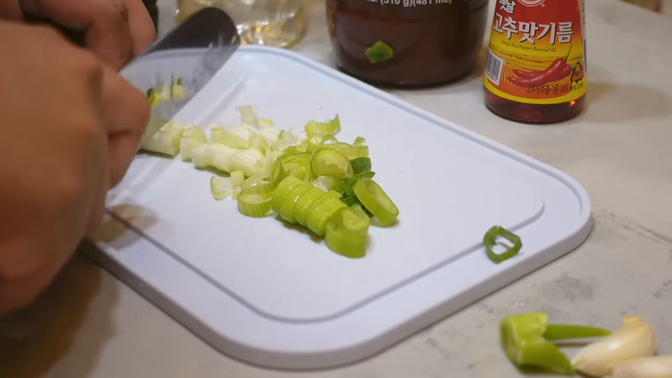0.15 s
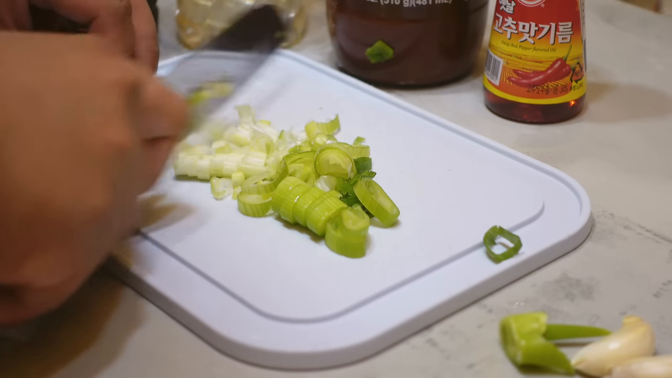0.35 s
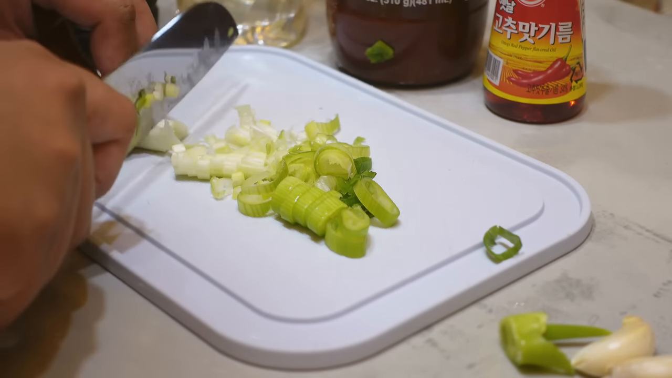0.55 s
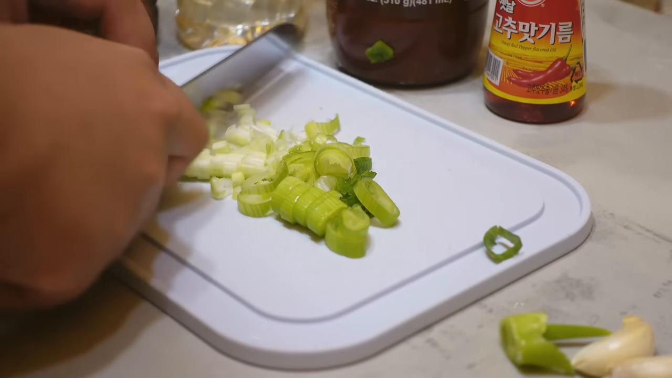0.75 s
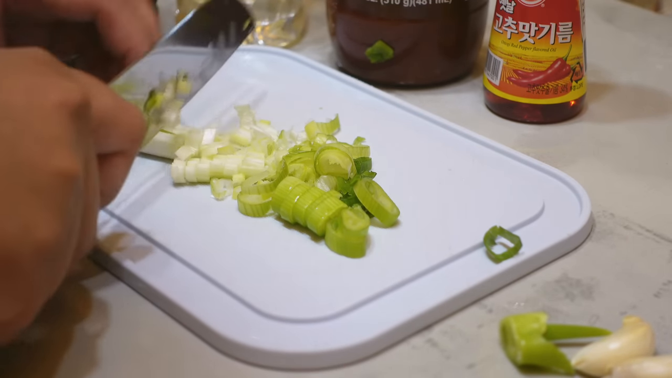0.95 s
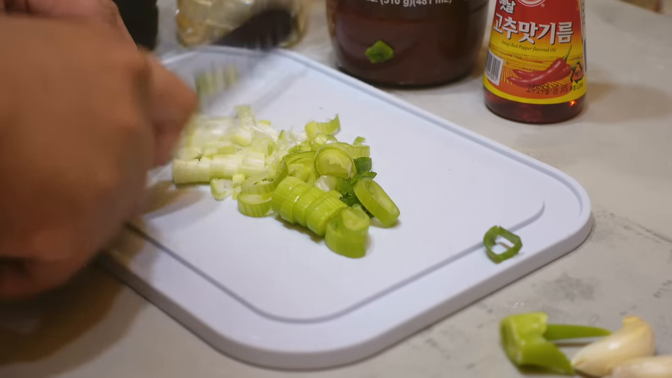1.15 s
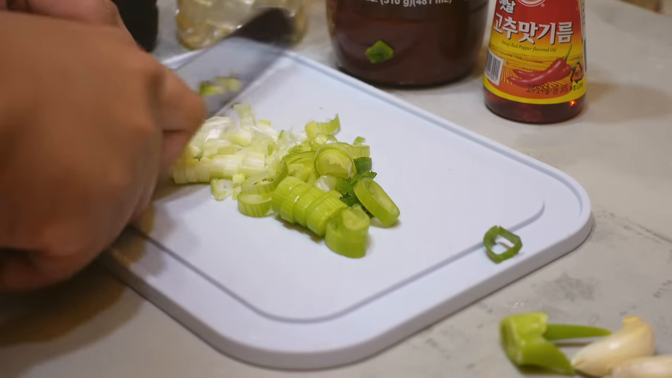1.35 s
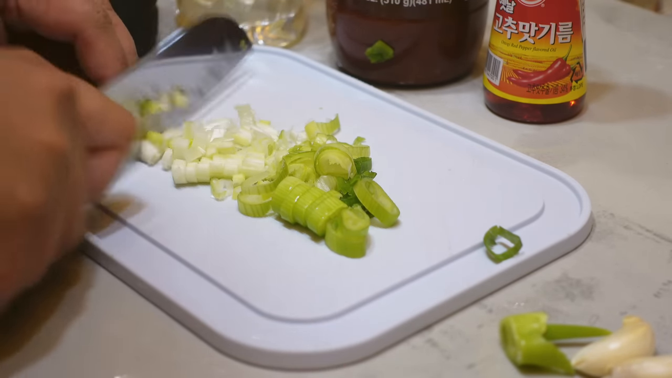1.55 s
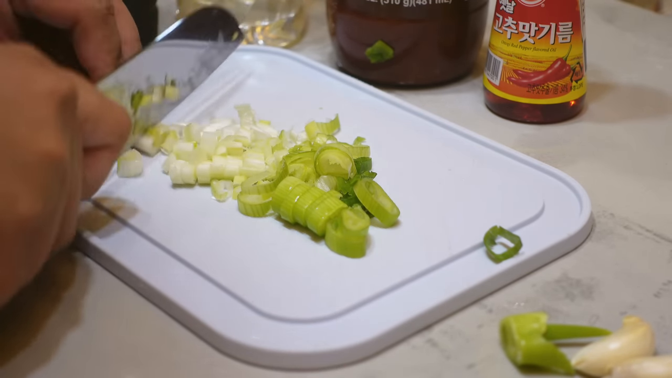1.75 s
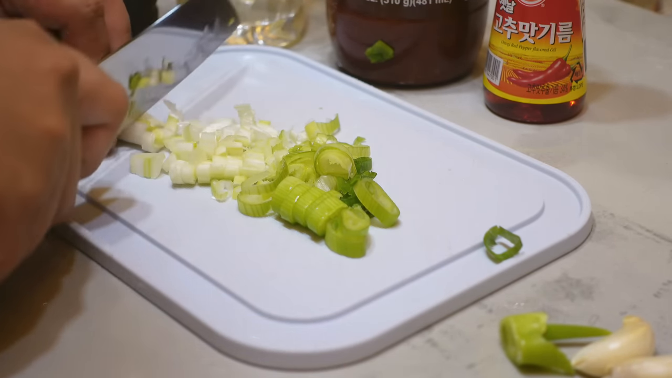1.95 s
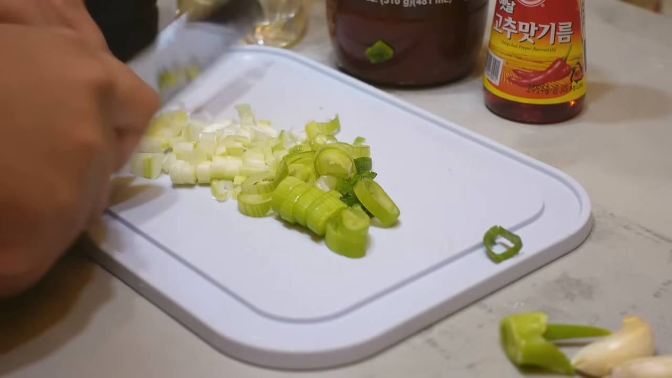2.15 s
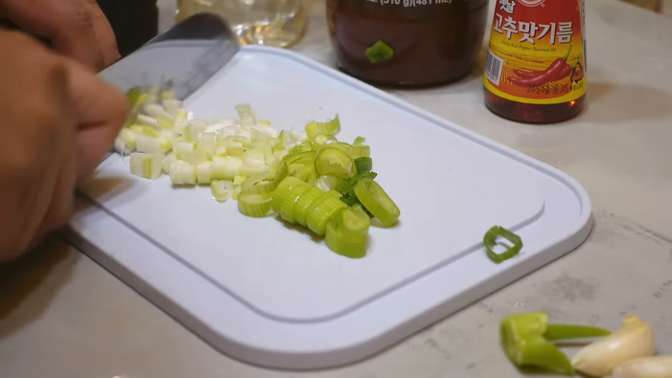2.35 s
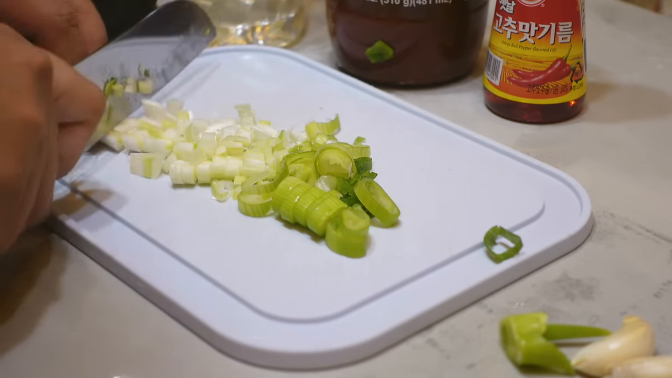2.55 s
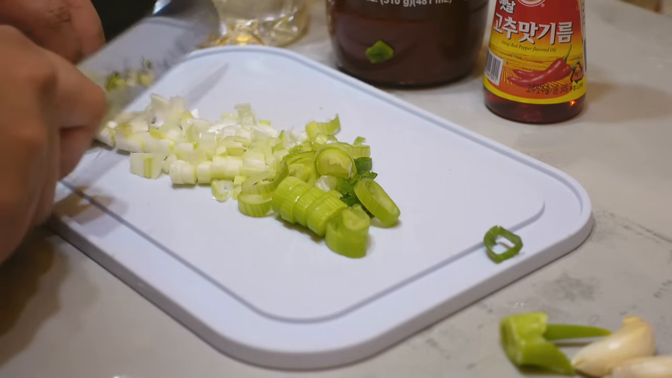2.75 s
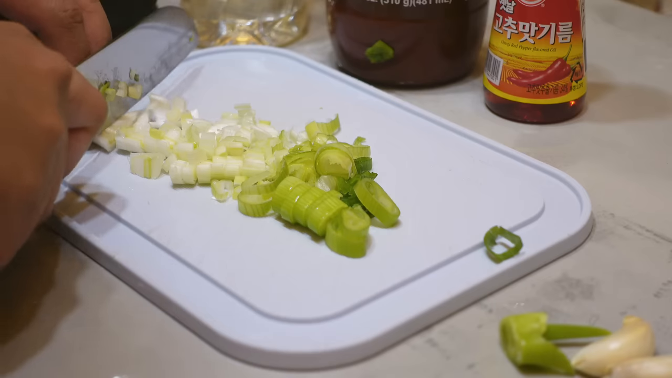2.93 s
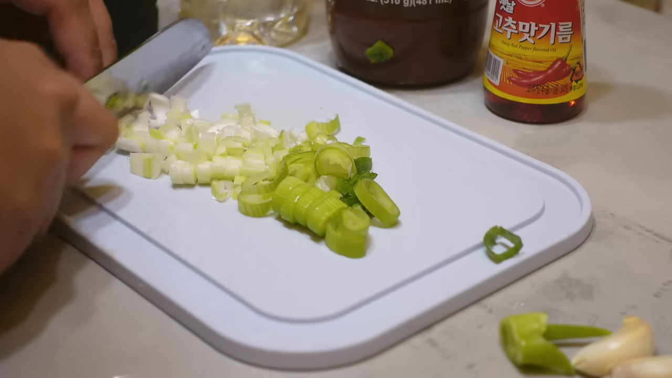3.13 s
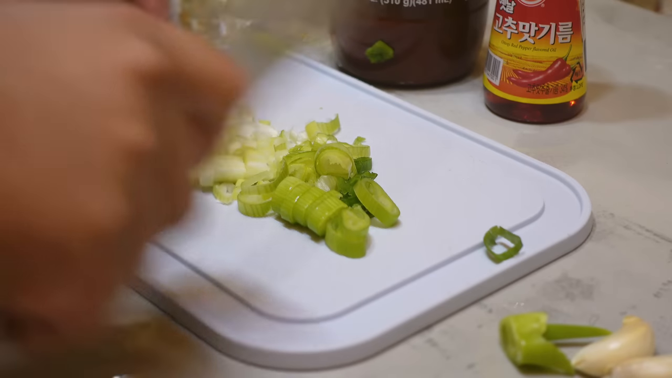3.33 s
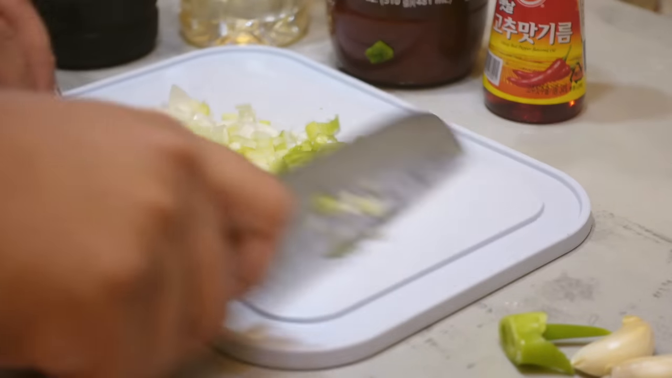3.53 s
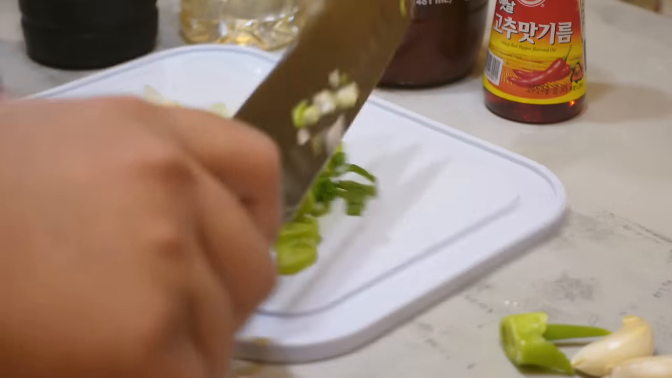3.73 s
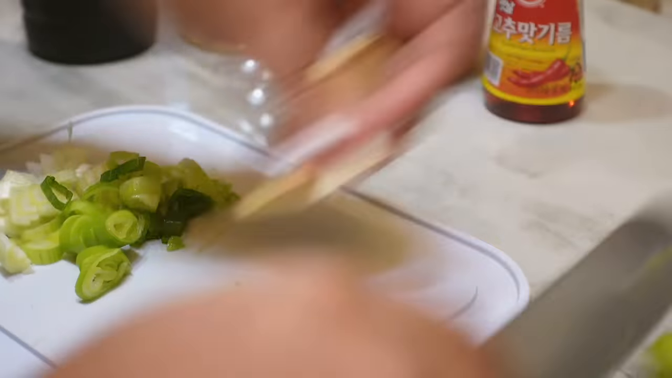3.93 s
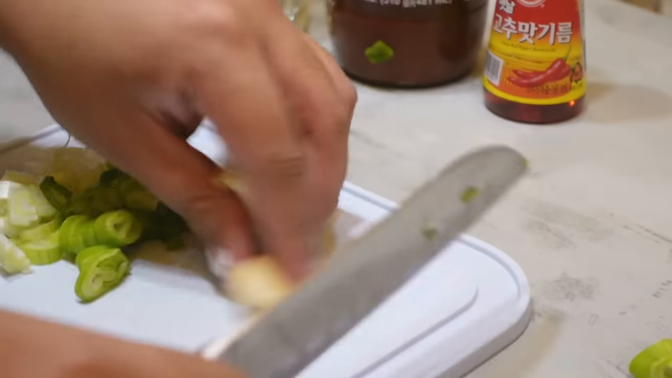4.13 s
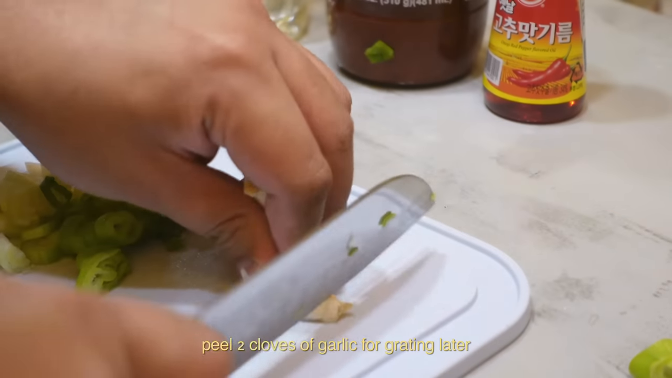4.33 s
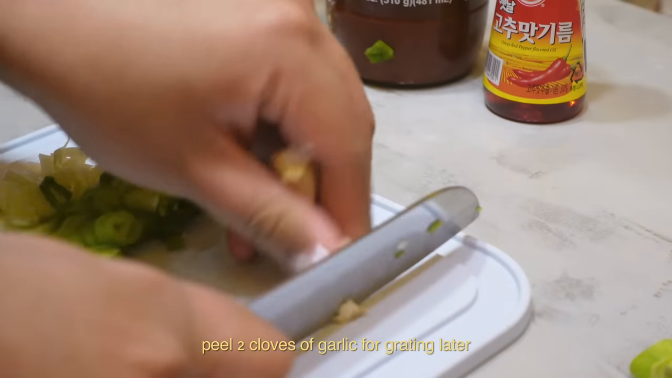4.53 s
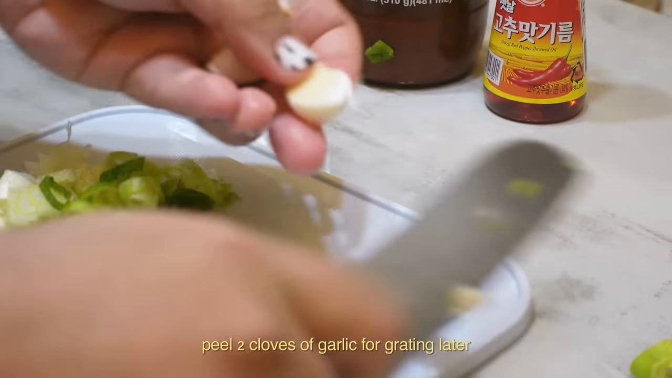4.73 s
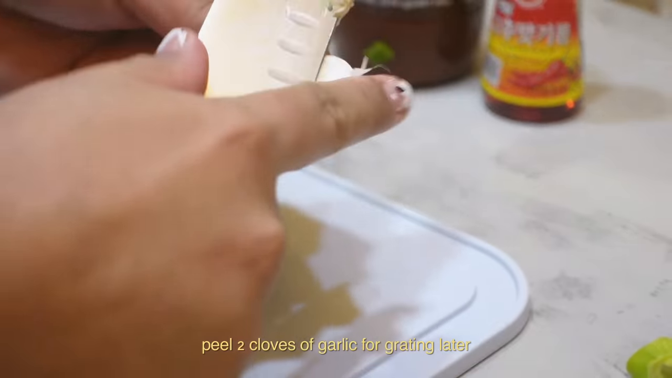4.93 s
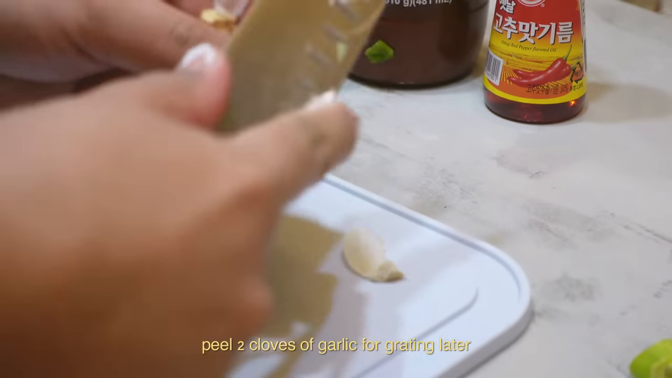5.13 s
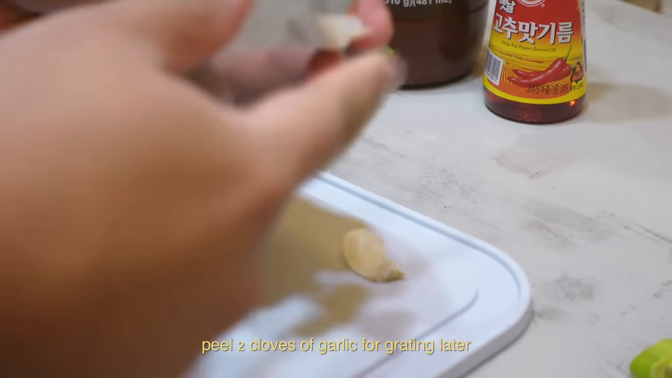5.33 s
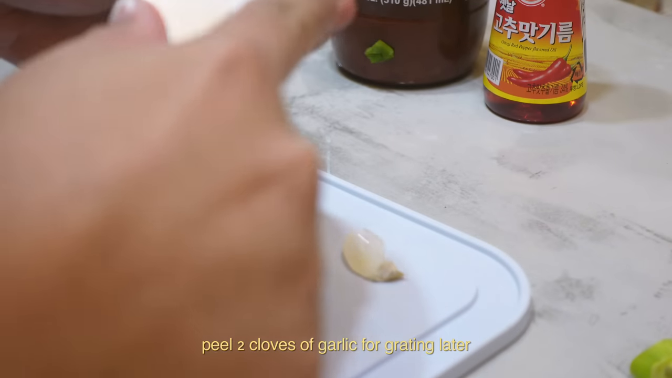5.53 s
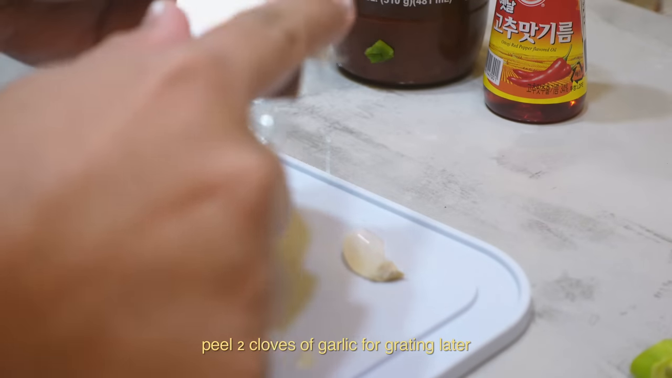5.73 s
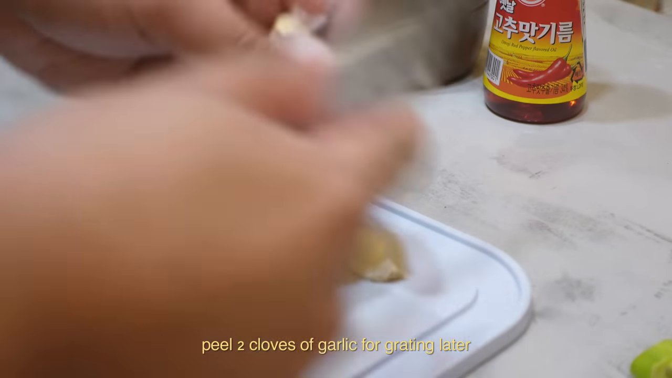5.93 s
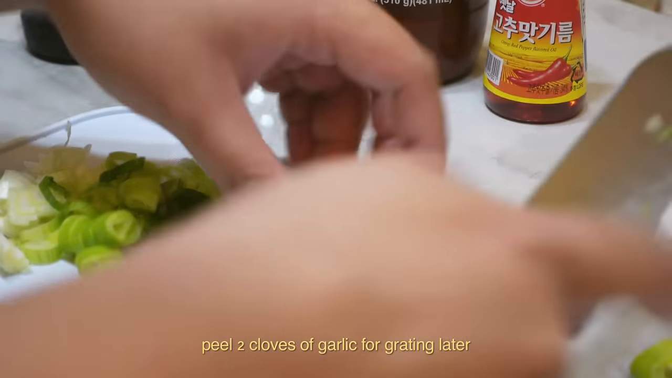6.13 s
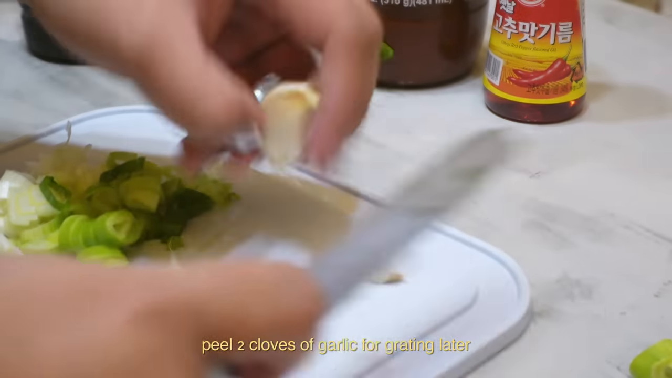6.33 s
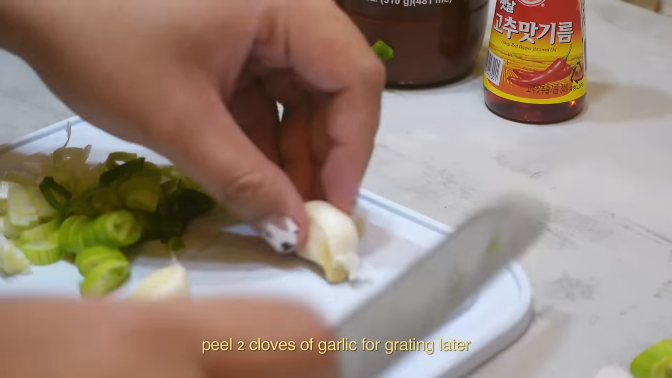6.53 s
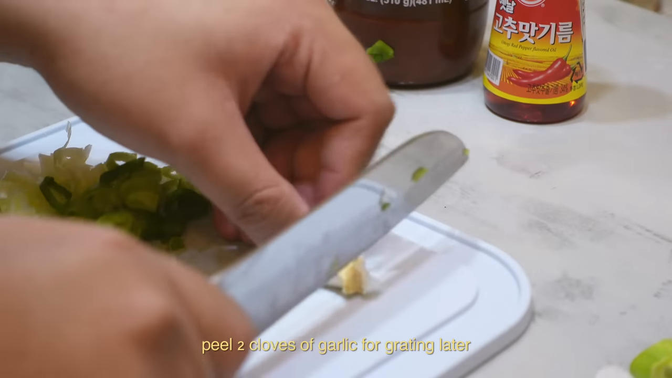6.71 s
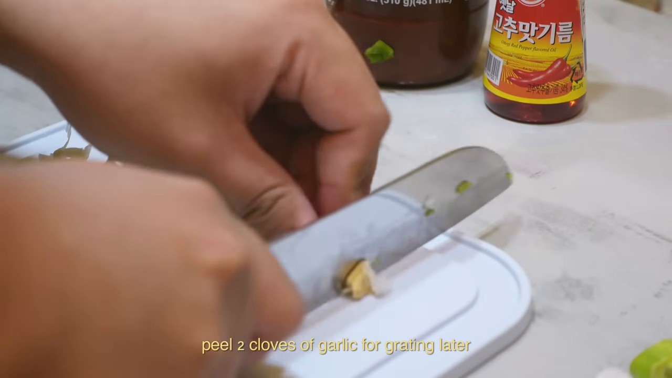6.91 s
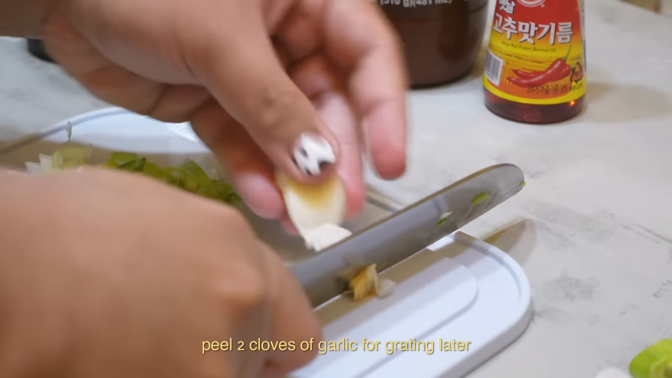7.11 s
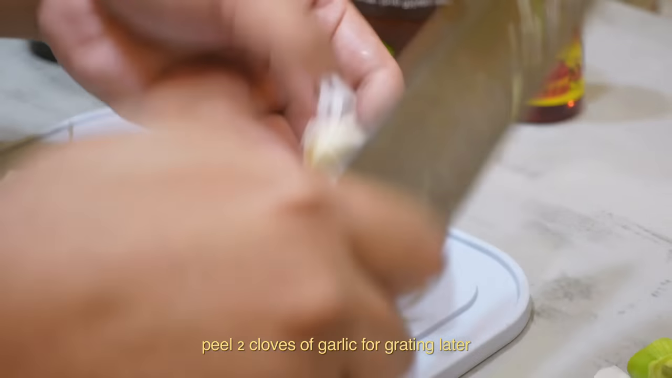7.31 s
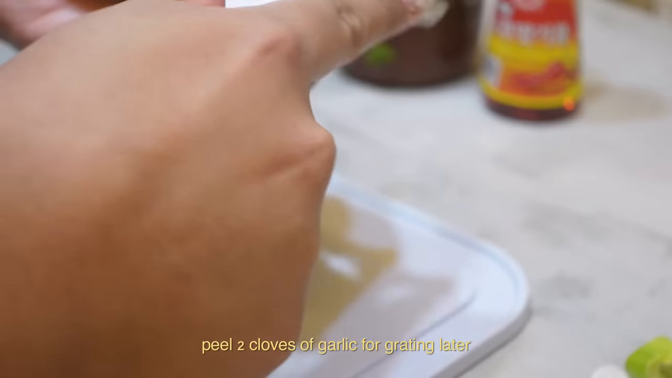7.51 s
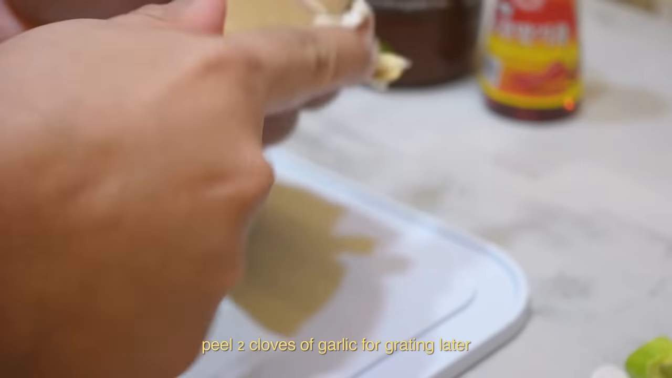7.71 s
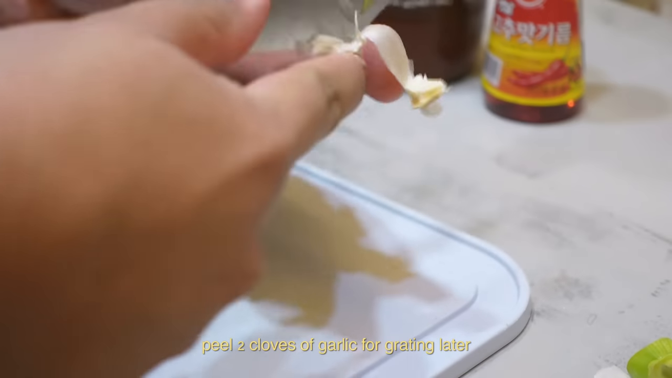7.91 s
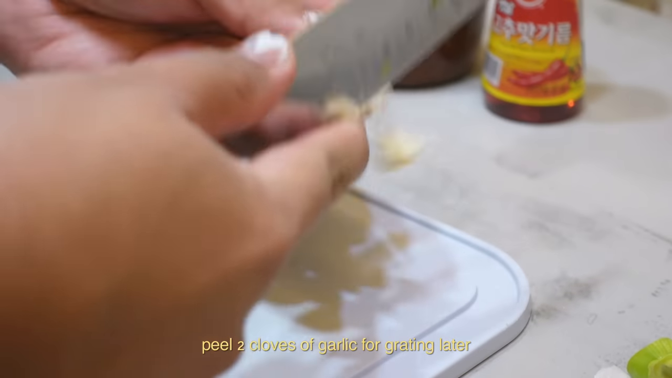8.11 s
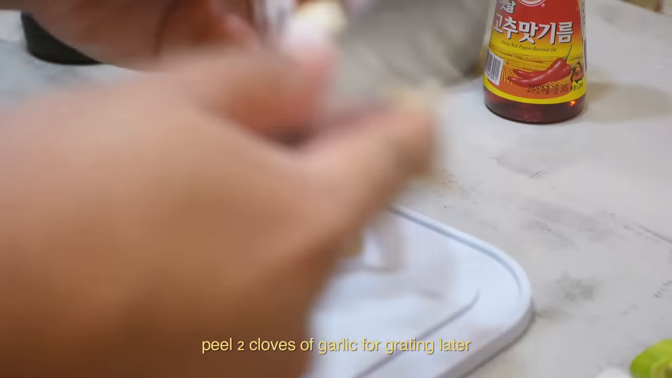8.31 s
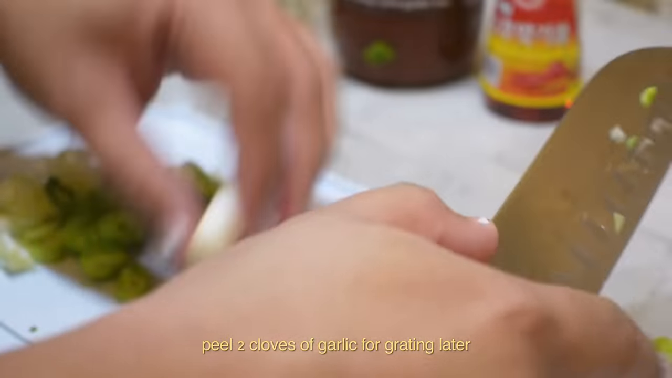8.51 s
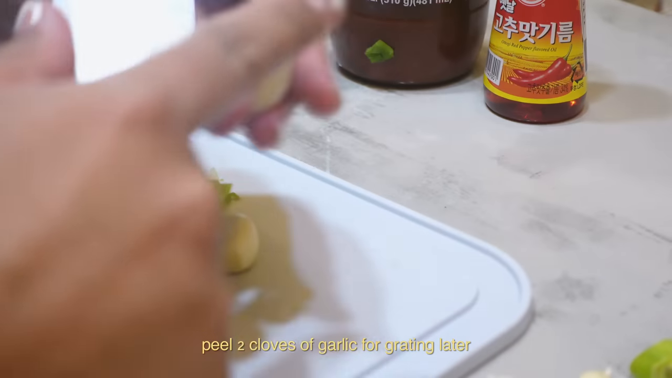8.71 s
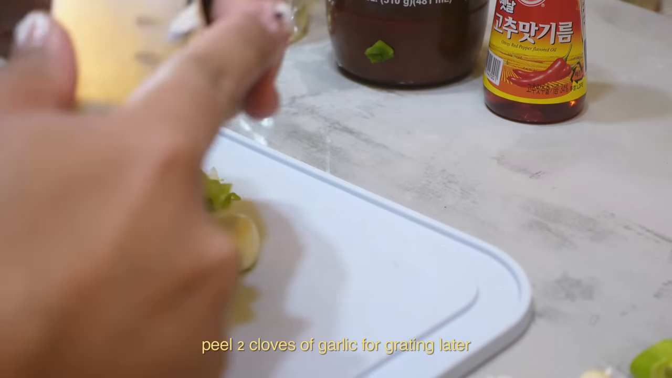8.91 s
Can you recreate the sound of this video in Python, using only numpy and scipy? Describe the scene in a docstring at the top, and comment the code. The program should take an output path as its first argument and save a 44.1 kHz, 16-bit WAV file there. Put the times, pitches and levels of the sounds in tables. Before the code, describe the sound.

Brisk crunchy chopping on a plastic cutting board, followed by quieter garlic trimming with sharp ticks, brief steel rings and papery peeling.

```python
"""Crisp chops on a plastic board in a small tiled kitchen, then garlic being trimmed and peeled.
Each cut is a burst of noise with a short bright echo; board and blade ring in their own modes.
Shaped noise makes the rub of hands and blade and the rustle of dry peel.
Street noise, hiss, an appliance hum and a passing drone lie under all."""
import sys
import numpy as np
from scipy import signal
from scipy.fft import rfft, irfft, next_fast_len
from scipy.io import wavfile
from scipy.ndimage import uniform_filter1d, map_coordinates

SR = 44100
rng = np.random.default_rng(int(sys.argv[2]) if len(sys.argv) > 2 else 0)


def bounce(signal):
    """Save signal as a 16-bit WAV file at the path given by the first command-line argument."""
    frames = np.transpose(np.atleast_2d(signal))
    limited = np.clip(frames, -1, 1)
    pcm = np.round(limited * 32767).astype(np.int16)
    wavfile.write(sys.argv[1], SR, pcm)


def voltage_ratio(level):
    """Linear amplitude factor for a level in decibels (scalar or array-like)."""
    return 10 ** (np.asarray(level, float) / 20)


N = 399526
TIME = np.arange(N) / SR
PEELING_FROM_S = 3.78  # chopping before, garlic after
TOP_HZ = 15900  # upper limit of the echoes, the rubbing and the hiss


def unit(x):
    """Scales a signal to rms 1."""
    return x / np.sqrt(np.mean(x ** 2) + 1e-20)


def along(points, hz):
    """Gain through (hz, gain_db) points on a log frequency axis, shut outside them."""
    point_hz, gain_db = np.transpose(points)
    return voltage_ratio(np.interp(np.log(hz + 1), np.log(point_hz + 1), gain_db, -120, -120))


def curves(rows):
    """One value per sample for each column after the time."""
    s, *columns = np.transpose(rows)
    return [np.interp(TIME, s, column) for column in columns]


def wobble(rate):
    """A smooth random curve with rate knots a second."""
    return map_coordinates(rng.standard_normal(int(N * rate / SR) + 4), [TIME * rate])


def filtered(x, response):
    """Multiplies the spectrum of x by a response of frequency, real or complex."""
    size = next_fast_len(N + 8192)
    return irfft(rfft(x, size) * response(np.fft.rfftfreq(size, 1 / SR)), size)[..., :N]


def rush(response, side_db, patchy_db=0, grain_db=0):
    """Stereo noise of rms 1, grainy in time and in random patches of time and frequency."""
    grains = rng.standard_normal((2, N)) * voltage_ratio(grain_db * wobble(400))
    spectrum = signal.stft(grains, nperseg=256)[2]
    patches = uniform_filter1d(rng.standard_normal(spectrum.shape[1:]), size=4, axis=0)
    patches = uniform_filter1d(patches, size=9, axis=1)
    pair = signal.istft(spectrum * voltage_ratio(patchy_db * unit(patches)), nperseg=256)[1][:, :N]
    mid, side = filtered(pair, response) * voltage_ratio([[0], [side_db]])
    return unit(np.array([mid + side, mid - side]))


def dying(times, db, t60, rise):
    """An envelope whose power gets a softened jump at each time and dies by 60 dB in t60 seconds."""
    jumps = np.bincount((times * SR).astype(int), voltage_ratio(2 * db), N)
    fall, soft = voltage_ratio(-2 * 60 / (t60 * SR)), np.exp(-1 / (rise * SR))
    decay = signal.lfilter([1], [1, -fall], jumps)
    return np.sqrt(signal.lfilter([1 - soft], [1, -soft], decay))


def tone(rows, partials):
    """A gliding line with (multiple, gain_db) partials, silent outside its (time_s, pitch_hz, level_db) rows."""
    hz, db = curves(rows)
    gate = np.clip(np.minimum(TIME - rows[0][0], rows[-1][0] - TIME) / .008, 0, 1)
    phase = 2 * np.pi * np.cumsum(hz) / SR
    return np.sqrt(2) * gate * voltage_ratio(db) * sum(voltage_ratio(g) * np.sin(k * phase) for k, g in partials)


# Blade through a stalk onto the board; levels before range colouring:
# start_s, crack_db, echo_db, echo_tilt_db, tear_lead_s
CHOPS = [(0.248, -15.5, -41.5, 1, 0.015), (0.686, -17, -41.5, 4, 0.019), (1.0863, -20, -40.5, 1, 0.015),
         (1.3138, -7.5, -38.5, 1.5, 0.013), (1.5714, -17.5, -40, 1, 0.0071), (1.795, -11, -42.5, 0, 0.0044),
         (2.0335, -12, -40.5, 3, 0.015), (2.3593, -9.5, -41, -7.5, 0.018), (2.6207, -14, -43, 4, 0.019)]
# Snaps of fibre, peel and blade on board, likewise: start_s, crack_db, echo_db, echo_tilt_db
SNAPS = [(.0025, -34, -49.5, 0), (0.3238, -38.5, -58.5, -1), (0.727, -26, -53, 1),
         (0.7659, -33.5, -58.5, -4), (1.078, -18, -61, 1), (1.289, -34, -61, 6), (1.3075, -24, -49.5, 1),
         (1.3834, -35, -63, 5), (2.78, -39, -63.5, 6), (2.997, -44, -72, 15), (3.045, -39.5, -56, 6.5),
         (3.076, -25.5, -56, 4), (3.1235, -46, -53.5, 3.5), (3.2362, -34.5, -64.5, -4.5),
         (3.2487, -33, -60, -6), (3.491, -27, -76, -14), (3.4977, -20, -47.5, -1.5),
         (3.5062, -13.5, -46.5, 2.5), (3.6662, -40.5, -65, -5), (3.9105, -11.5, -40.5, 2),
         (3.993, -45, -75, -8), (4.2564, -45.5, -61, 9), (4.297, -48, -85.5, -17), (4.349, -46, -87, -16),
         (4.436, -15.5, -48.5, -4.5), (4.5377, -27, -54, 9.5), (4.6488, -27.5, -60, 2),
         (4.71, -27.5, -51, 1), (4.865, -35, -86.5, -16), (5.006, -48, -85, 9), (5.034, -41, -84, 9),
         (5.061, -46, -81, 13), (5.0965, -37, -72.5, 14.5), (5.235, -24.5, -59.5, 8),
         (5.614, -50.5, -56, 0.5), (5.7287, -33.5, -80, 13), (5.7844, -47, -54.5, 1.5),
         (5.7996, -20, -53.5, 10.5), (5.9396, -27, -61.5, -8.5), (5.947, -36, -69, -7),
         (5.9624, -28, -85, -12), (5.977, -45, -85, 10.5), (6.102, -46, -76, -5),
         (6.4443, -16.5, -55.5, -9), (6.4623, -20, -51, -2), (6.5355, -16.5, -71.5, -17),
         (6.5468, -29, -52, 3), (6.5532, -25, -66, -7.5), (6.902, -28, -45, 5), (6.9113, -13, -45.5, -2),
         (6.9137, -12, -51, -4.5), (7.049, -25.5, -70, 14), (7.148, -17.5, -63, 13.5),
         (7.1696, -30.5, -66, 5), (7.2048, -32, -61, -1), (7.228, -42.5, -66, 6), (7.258, -28, -56, 7.5),
         (7.283, -48, -67, 7), (7.438, -56, -74, -7.5), (7.7209, -36, -78, 10), (7.7856, -36, -71.5, 9),
         (7.903, -47.5, -86.5, -14.5), (7.9886, -38, -83, 16), (8.011, -34, -83, 18),
         (8.0365, -26.5, -71, 17), (8.0458, -25, -66.5, 16.5), (8.056, -35, -70, 10),
         (8.1025, -23, -69, 16), (8.179, -45, -67.5, -0.5), (8.256, -20, -70, 22), (8.284, -43, -77, 1),
         (8.398, -36.5, -93, -19), (8.5203, -41, -83, 7), (8.607, -42.5, -86, -14.5)]
# Dry garlic peel rustles: start_s, length_s, level_db, width_octaves
RUSTLES = [(4.055, .078, -68.5, 0.21), (4.657, .069, -58, 0.14), (4.97, 0.071, -69.5, 0.47),
           (5.415, 0.059, -72, .12), (5.723, .046, -64, 0.2), (6.09, 0.14, -80, .14),
           (6.63, 0.13, -67.5, .2), (6.792, 0.21, -68.5, .15), (7.023, 0.032, -56, 0.46),
           (7.083, 0.18, -56, 0.61), (7.317, 0.042, -65, .17), (7.438, 0.059, -61, 0.22),
           (7.538, 0.087, -61.5, .2), (7.622, 0.08, -56.5, 0.51), (7.912, .061, -62.5, 0.44),
           (8.202, 0.043, -57, 0.34), (8.7, .065, -62.5, 0.18), (8.74, 0.18, -62, 0.38),
           (9.03, 0.066, -62, 0.52)]
# Echo offset in the low, body, middle and top range: offset_db
CHOP_RANGES_DB = [-16.5, -9, 1, -7.5]
SNAP_RANGES_DB = [-13, -2.5, 0, -.5]
# How far each range follows the tilt: db_per_tilt_db
CHOP_TILT = [-1.67, -1.9, -0.082, 0.72]
SNAP_TILT = [-2.05, -0.89, -0.025, 1]


def contacts():
    """Every blow, the stalk tearing ahead of it, the snaps, and one chance tick within each rustle of peel."""
    s, crack_db, echo_db, tilt_db, lead_s = np.transpose(CHOPS)
    # a tearing cracks and echoes less than its blow, with a brighter tilt
    tears = np.transpose([s - lead_s, crack_db - 14.5, echo_db - 9, tilt_db + 10.5])
    chance = rng.random((len(RUSTLES), 2))
    ticks = []
    for (start, length, *_), (place, strength) in zip(RUSTLES, chance):
        tick_s = min(start + length * place, TIME[-1])
        tick_db = -55 + 6 * (2 * strength - 1)  # scatters by 6 dB either way
        ticks.append((tick_s, tick_db, -86.5, 8))
    rows = np.vstack([np.array(CHOPS)[:, :-1], tears, SNAPS, ticks])
    s, crack_db, echo_db, tilt_db = rows.T
    chop_count, snap_count = 2 * len(CHOPS), len(SNAPS) + len(ticks)
    ranges_db = [CHOP_RANGES_DB] * chop_count + [SNAP_RANGES_DB] * snap_count
    follows = [CHOP_TILT] * chop_count + [SNAP_TILT] * snap_count
    return s, crack_db, echo_db + tilt_db * np.transpose(follows) + np.transpose(ranges_db)


# Colour of cracks and echoes: freq_hz, gain_db (per Hz)
SNAP_COLOUR = [(600, -18.5), (1100, -14), (2000, -7.5), (6000, -4.5), (13000, -3), (15800, -1.5),
               (17000, -44)]
# Edges of the low, body, middle and top range: edge_hz
SPLIT_HZ = [0, 2600, 5000, 9500, SR]
# Fast echo decay in those ranges: t60_s
ECHO_T60 = [0.15, 0.18, 0.14, 0.14]


def cuts():
    """A crack of a few ms, then crunch and near walls dying fast and the room slowly, range by range."""
    s, peak_db, echo_db = contacts()
    lead = SR // 250
    t = TIME[:2 * lead] - lead / SR
    # stalks tear before they give, dry peel snaps at once (s per 60 dB of rise)
    tearing = np.where(s < PEELING_FROM_S, .011, .003)[:, None]
    envelope = voltage_ratio(-60 * np.where(t < 0, -t / tearing, t / 0.0042))
    splinters = rng.standard_normal((len(s), len(t))) * envelope
    splinters /= np.abs(splinters).max(axis=1, keepdims=True)
    places = ((s * SR).astype(int)[:, None] - lead + np.arange(len(t))).clip(0).ravel()

    def below(hz, edge):
        return 1 / (1 + (hz / (edge + 1)) ** 8)

    sound = 0
    for low, high, db, t60 in zip(SPLIT_HZ, SPLIT_HZ[1:], echo_db, ECHO_T60):
        def colour(hz):
            return along(SNAP_COLOUR, hz) * np.sqrt(below(hz, high) - below(hz, low))

        # the crack takes the colour of its echo
        lean_db = db - np.max(echo_db, axis=0) - 1.34 * np.log2(high / 16000)
        crack_gain = voltage_ratio(peak_db + lean_db)[:, None]
        crack = np.bincount(places, (crack_gain * splinters).ravel(), N)[:N]
        near = dying(s, db, t60, rise=0.0015)
        room = dying(s, db - 17.5, 0.36, rise=.01)
        noise = rush(lambda hz: (hz < TOP_HZ) * colour(hz), side_db=-11.5, patchy_db=2.5, grain_db=3.0)
        sound = sound + filtered(crack, colour) + np.hypot(near, room) * noise
    return sound


# The board knocks on the counter by itself: start_s, push_db
KNOCKS = [(2.66, -54), (2.699, -51), (2.734, -53), (3.504, -58), (6.532, -50.5), (6.908, -54)]
# Modes of the board: freq_hz, width_hz, gain_db
BOARD = [(404, 152, -8.5), (590, 220, -4), (838, 114, -1.5), (1049, 94, 0.5)]


def board():
    """Short noisy pushes, alone and just after every chop, coloured by the resonant modes of the board."""
    # 3.9 ms after the blow, 0.8 dB per dB of it
    after_chops = [(chop[0] + 0.0039, -45 + .8 * chop[1]) for chop in CHOPS]
    s, db = np.transpose(KNOCKS + after_chops)
    push = dying(s, db, t60=0.057, rise=0.016)

    def modes(hz):
        total = 0
        for k, (centre, width, gain_db) in enumerate(BOARD):
            damping = 1j * hz * width
            # neighbouring modes alternate in sign
            total = total + (-1) ** k * voltage_ratio(gain_db) * damping / (centre * centre - hz * hz + damping)
        return total

    return push * rush(modes, side_db=-14.5)


# Touches that set the blade, or the garlic and board beneath it, ringing: start_s, contact_s, hold (name),
# base_db
TOUCHES = [(0.758, 0.0037, "pressed", -50), (3.244, 0.0033, "pressed", -48),
           (3.493, 0.0027, "pressed", -46.5), (3.504, .004, "pressed", -46),
           (3.665, 0.0032, "pressed", -51.5), (4.699, 0.0079, "free", -44),
           (4.707, 0.002, "on_garlic", -51), (6.389, 0.0018, "free", -58.5), (6.457, 0.0035, "free", -28),
           (6.543, 0.0023, "free", -30), (6.546, 0.0038, "on_garlic", -33.5), (6.551, .004, "free", -49),
           (6.552, 0.0045, "on_garlic", -37), (6.766, .002, "free", -60.5)]
# Modes rung under each hold (the steel blade when pressed or free, a hollow of garlic and board when
# on_garlic): freq_hz, offset_db, t60_s
BLADE = dict(pressed=[(2254, 7, 0.05), (4110, 3, 0.062), (5500, -8, 0.033), (9200, -20, 0.66),
         (10000, -9, 0.099)], free=[(3200, -5, .05), (5350, -18, .1), (7350, -5, .075), (8890, -15, .08),
         (11435, 0, .1), (12890, -11, .09)], on_garlic=[(1270, -6, 0.036), (1670, 4.5, 0.024),
         (2046, -2.5, 0.046), (2300, -7, 0.082), (2920, -16, 0.11)])


def blade():
    """Each touch rings the modes of its hold at new strengths; the moving hand roughens level and phase."""
    ring, t = np.zeros(N + SR), TIME[:SR // 4]
    for s, contact, held, db in TOUCHES:
        start = round(s * SR)
        grow = 1 - np.exp(-t / max(contact, 1e-4))
        for hz, level, t60 in BLADE[held]:
            flutter, drift = (map_coordinates(rng.standard_normal(40), [t * 120]) for _ in range(2))
            gain_db = db + level + rng.normal(0, 1.5) + 4 * flutter - 60 * t / t60
            ring[start:start + len(t)] += voltage_ratio(gain_db) * grow * np.sin(2 * np.pi * hz * t + 1.7 * drift)
    return ring[:N]


# Skin squeaks on steel: time_s, pitch_hz, level_db
SQUEAK = [(6.330, 4570, -65), (6.360, 4700, -59), (6.388, 4530, -60)]


def squeak():
    """Stick and slip: a rough stack at half steps of the pitch that lets go twice."""
    slips = 1 - sum(np.exp(-((TIME - s) / 0.004) ** 2) for s in (6.355, 6.374))
    return tone(SQUEAK, [(.5, -3), (1, 0), (3 / 2, -14)]) * slips * voltage_ratio(3 * wobble(500))


# Hands and blade rub: start_s, length_s, level_db, centre_hz, width_octaves
RUB = [(0.023, .11, -62.5, 8800, 0.48), (0.33, 0.12, -63.5, 8400, 0.27), (0.763, .072, -64, 8900, 0.24),
       (.888, .089, -66.5, 8800, .2), (1.01, 0.11, -63, 12900, 0.27), (1.195, 0.087, -60.5, 8850, 0.23),
       (1.35, 0.11, -58, 7600, 0.4), (1.428, .16, -64.5, 3840, .33), (1.76, 0.092, -56, 7860, .98),
       (2.192, 0.073, -66, 4800, 0.72), (2.506, 0.21, -61.5, 11900, .64), (2.626, 0.084, -56.5, 3400, 0.34),
       (2.75, .11, -58.5, 8800, 0.77), (2.793, 0.1, -60, 3920, 0.39), (2.975, .13, -57.5, 10900, .99),
       (3.188, 0.04, -60, 8900, .99), (3.36, 0.062, -61, 6560, .98), (4.254, .035, -57.5, 9000, 0.49),
       (4.473, 0.049, -61, 7750, 0.67), (4.6, .076, -60.5, 7500, .38), (5.165, 0.045, -63, 9000, .98),
       (5.54, 0.039, -59.5, 8700, .98), (5.603, 0.056, -57.5, 7040, .99), (6.278, .11, -63, 1950, 0.41),
       (7.635, 0.039, -54.5, 4900, 0.51), (7.771, 0.018, -57, 13000, 0.64)]
# Rings of the rubbed blade: freq_hz, width_hz, boost_db
RIDGES = [(7210, 590, 7), (8800, 50, 11.5), (9700, 140, 9), (10000, 310, 1.5), (12200, 270, 11.5),
          (12620, 770, 3.5), (13400, 750, -0.5)]


def rubbing():
    """Papery friction: each stroke swells fast, fades slowly and favours one range and the blade's rings."""
    def ridges(hz):
        boost_db = sum(db / (1 + (2 * (hz - c) / w) ** 2) for c, w, db in RIDGES)
        return (hz < TOP_HZ) * voltage_ratio(boost_db)

    friction = rush(ridges, side_db=-11.5, patchy_db=3, grain_db=1.5)
    hz, t, spectrum = signal.stft(friction, SR, nperseg=512)
    # the blade slides into the stalk before every chop
    slides = [(chop[0] - 0.051, 0.051, -60, 11300, 1) for chop in CHOPS]
    peel = [(s, length, db, 11530, octaves) for s, length, db, octaves in RUSTLES]
    power = 0
    for s, length, db, centre_hz, octaves in RUB + slides + peel:
        u = np.clip((t - s) / length, 0, None)
        swell = (1 - np.exp(-u / 0.41)) / (1 + u ** 4)
        band = np.exp(-(np.log2((hz + 1) / centre_hz) / octaves) ** 2)
        power = power + voltage_ratio(2 * db) * np.outer(band / band.mean(), swell ** 2)
    return signal.istft(spectrum * np.sqrt(power), SR, nperseg=512)[1][:, :N]


# Street level over time, in two runs: time_s, rumble_db, roar_db
STREET = [
    [(0.0, -88, -66.5), (1.73, -89, -75), (3.63, -89.5, -74.5), (3.77, -91, -78.5)],
    [(3.79, -90, -79), (3.88, -99, -77.5), (8.15, -100, -79.5), (8.35, -93, -79), (9.06, -99, -77.5)],
]
# Colours of the street's two layers: freq_hz, gain_db (per Hz)
RUMBLE = [(24, -76), (40, -41), (258, -9.5), (380, -10), (490, -29), (840, -120)]
ROAR = [(150, -29), (250, -24), (421, -4.5), (655, 0), (936, -9.5), (1000, -12), (1600, -22.5), (2080, -42),
        (3520, -120)]


def street():
    """Street noise through the walls: a low rumble and a fuller roar, each shaped noise."""
    rumble_db, roar_db = curves(sum(STREET, []))
    rumble = voltage_ratio(rumble_db) * rush(lambda hz: along(RUMBLE, hz), side_db=-5, patchy_db=-3.0)
    roar = voltage_ratio(roar_db) * rush(lambda hz: along(ROAR, hz), side_db=-7.5, patchy_db=2.0)
    return rumble + roar


# Colour of the hiss: freq_hz, gain_db (per Hz)
HISS = [(470, -35), (800, -1.5), (1250, -2), (1370, -2.5), (5540, -9.5), (10700, -12.5), (11900, -10),
        (15800, -14.5)]
# Hiss while chopping, then while peeling: level_db
HISS_DB = [-70, -71]


def hiss():
    """Steady shaped noise that steps in level when the peeling starts."""
    level_db = np.where(TIME >= PEELING_FROM_S, HISS_DB[1], HISS_DB[0])
    return voltage_ratio(level_db) * rush(lambda hz: (hz < TOP_HZ) * along(HISS, hz), side_db=-5.5)


def wavering(hz, db):
    """A sine whose level and phase wander slowly."""
    level = voltage_ratio(db + 1.9 * wobble(8.6))
    return level * np.sin(2 * np.pi * hz * TIME + 1.2 * wobble(4.5))


# An appliance at two speeds: start_s, end_s, pitch_hz, first_db, second_db, third_db (multiples of pitch)
HUM = [(0, 3.78, 311, -92.5, -93.5, -83), (3.78, 9.8, 413.3, -95.5, -85.5, -83)]


def hum():
    """The appliance sounds its first three multiples and jumps to another speed."""
    sound = 0
    for start, end, hz, *levels in HUM:
        running = (TIME >= start) & (TIME < end)
        for k, db in enumerate(levels, 1):
            sound = sound + running * wavering(k * hz, db)
    return sound


# A faint high line: pitch_hz, level_db
WHINE = (11800, -87)


def whine():
    """A wavering high sine, present only while peeling."""
    return (TIME >= PEELING_FROM_S) * wavering(*WHINE)


# A far low drone in two passes: time_s, pitch_hz, level_db (before the gains of its partials)
DRONE = [
    [(0.42, 142, -103), (0.536, 144, -81), (0.68, 147, -97)],
    [(0.78, 157, -99), (0.924, 112, -87), (1.35, 110, -102)],
]


def drone():
    """Each pass glides in pitch and swells, with a fundamental and a third multiple."""
    return sum(tone(rows, [(1, -0.5), (3, 0)]) for rows in DRONE)


def background():
    """The steady layers under the hands."""
    return street() + hiss() + hum() + whine() + drone()


def scene():
    """The hands work a little right of centre."""
    hands = cuts() + board() + blade() + squeak() + rubbing()
    return hands * voltage_ratio([[-.2], [.2]]) + background()


def low_pass(x):
    """Removes everything above the highest recorded frequency."""
    return signal.sosfilt(signal.butter(12, 16990, fs=SR, output="sos"), x)


def record(dry):
    """A microphone deaf to bass, rolling off below 90 Hz."""
    mix = filtered(dry, lambda hz: 1 / np.sqrt(1 + (90 / (hz + 1)) ** 4))
    return low_pass(mix)


dry = scene()
out = record(dry)
bounce(out)
```